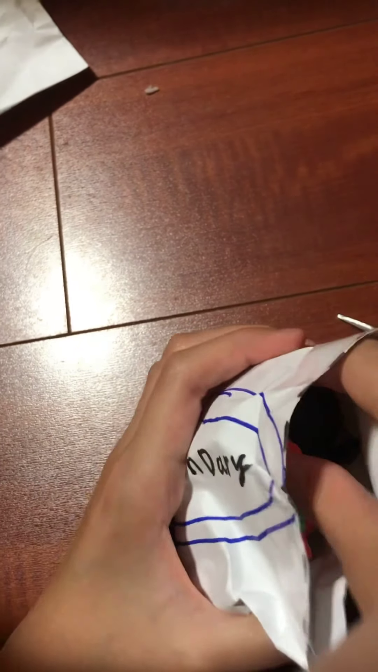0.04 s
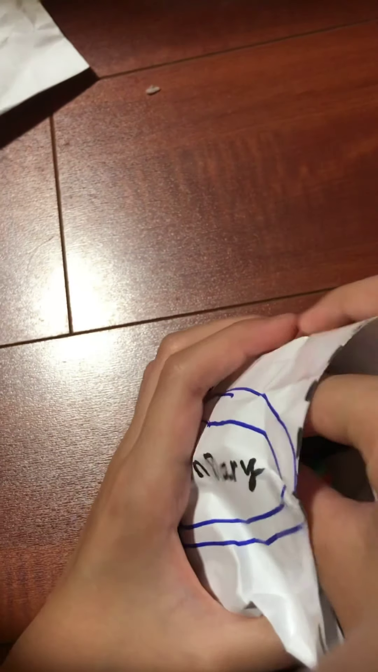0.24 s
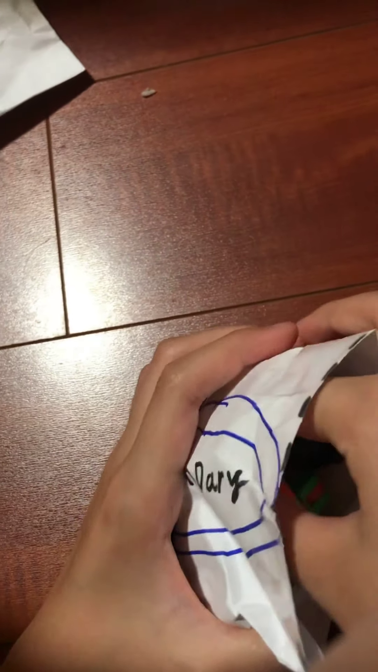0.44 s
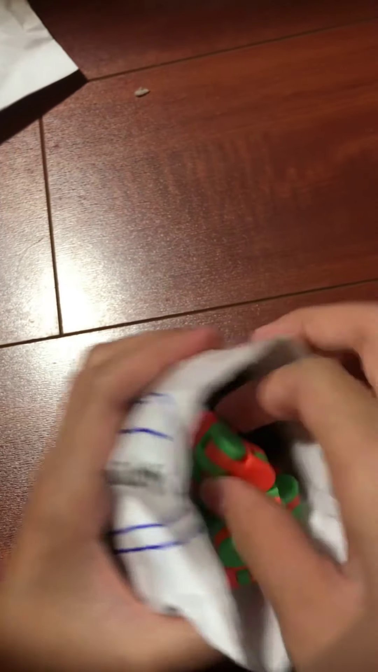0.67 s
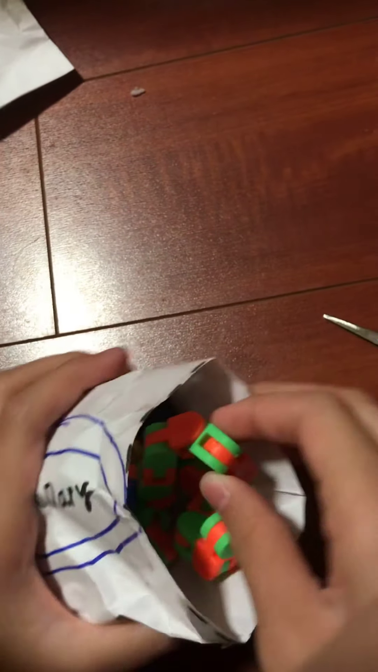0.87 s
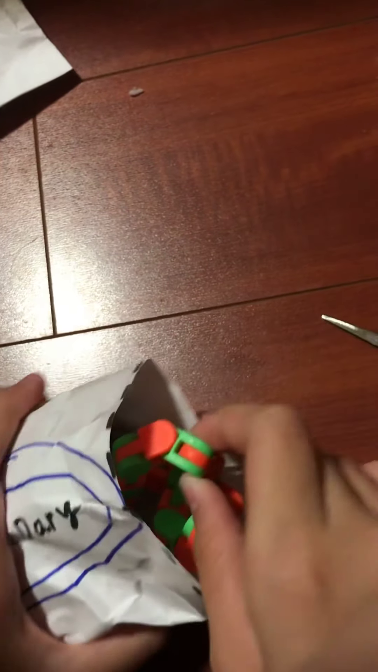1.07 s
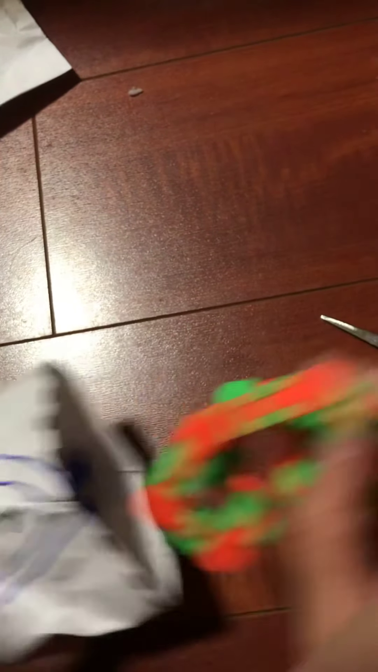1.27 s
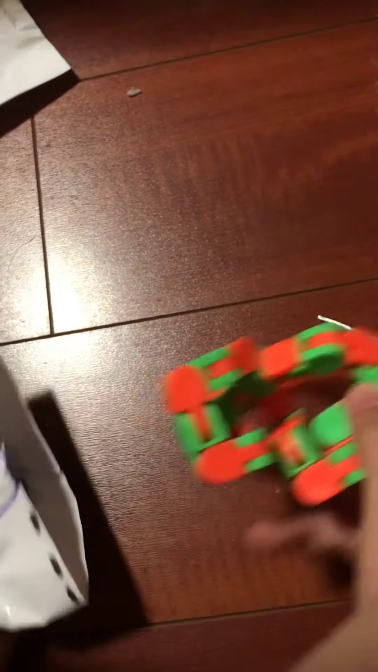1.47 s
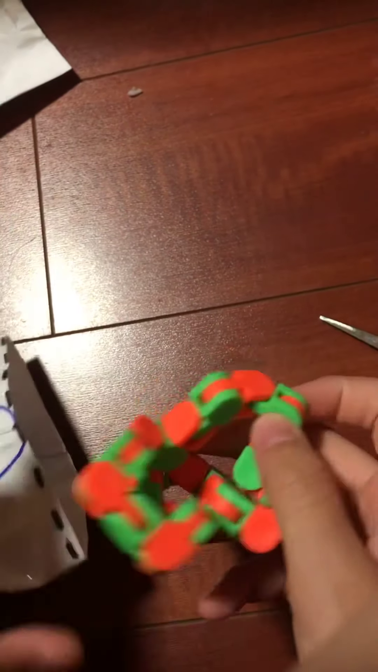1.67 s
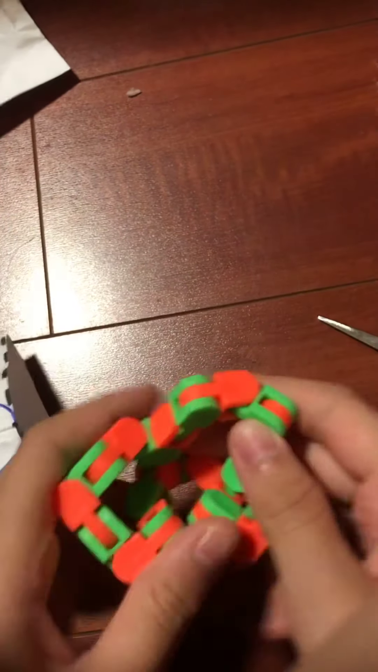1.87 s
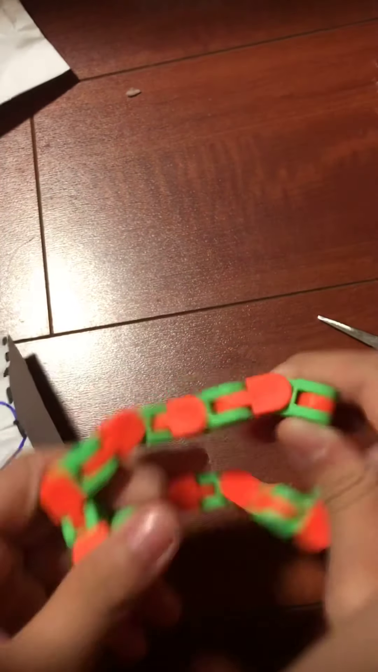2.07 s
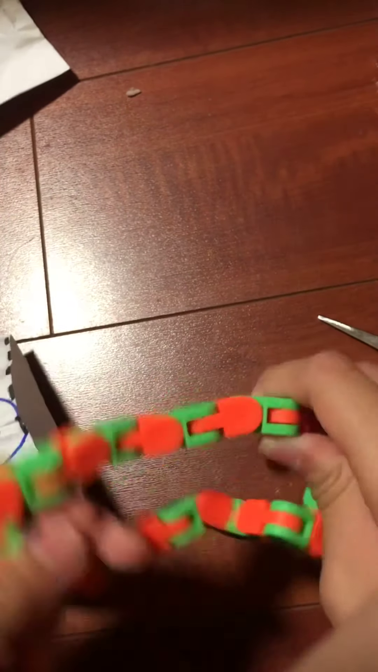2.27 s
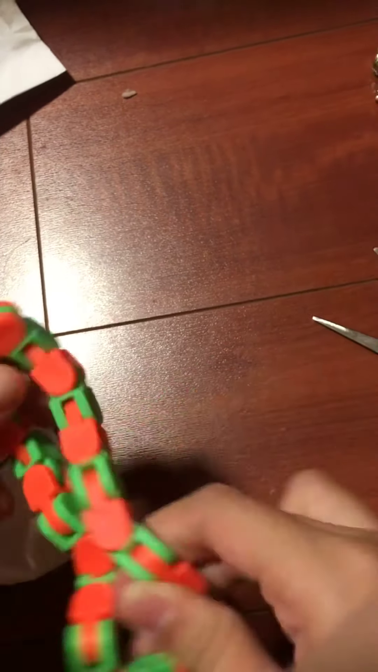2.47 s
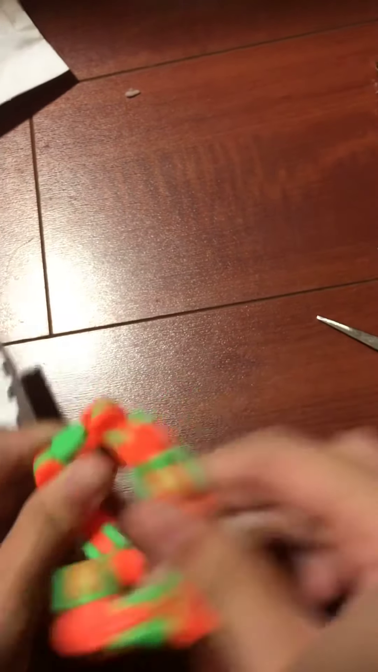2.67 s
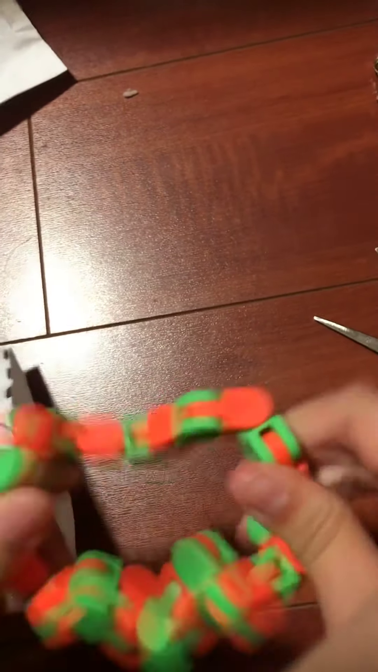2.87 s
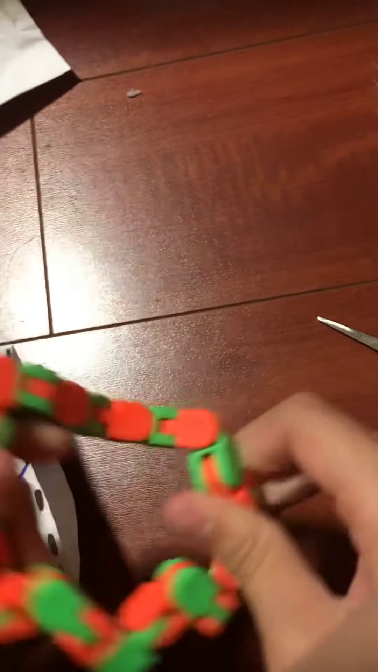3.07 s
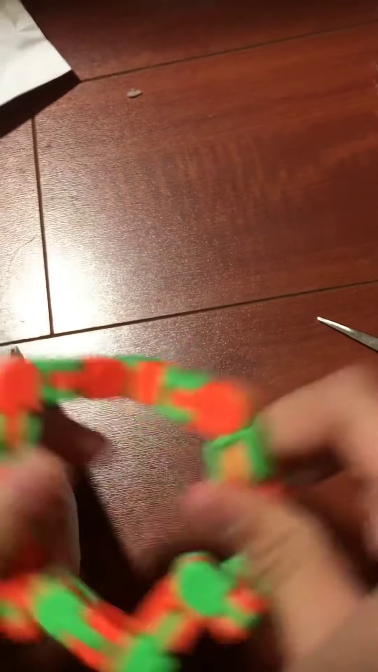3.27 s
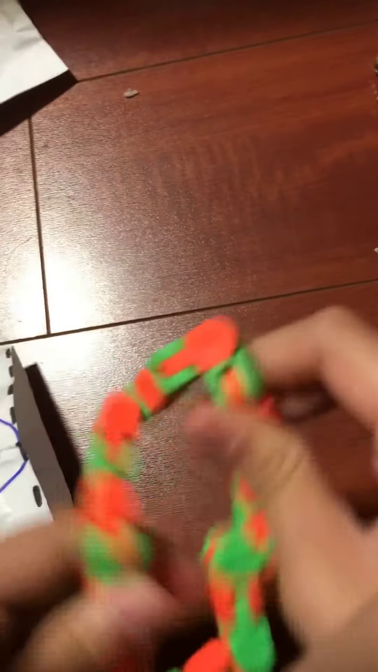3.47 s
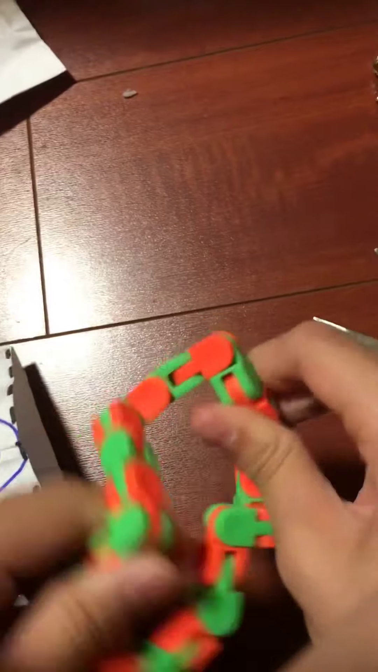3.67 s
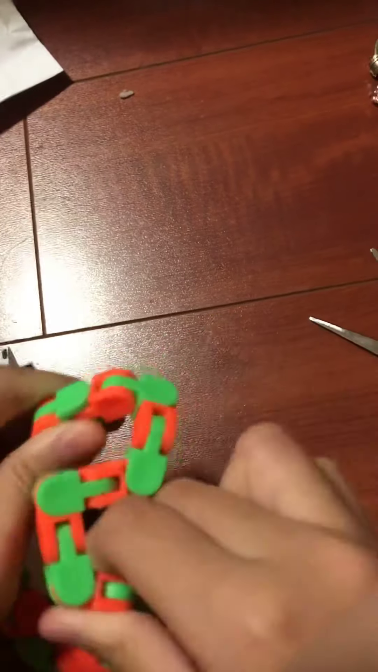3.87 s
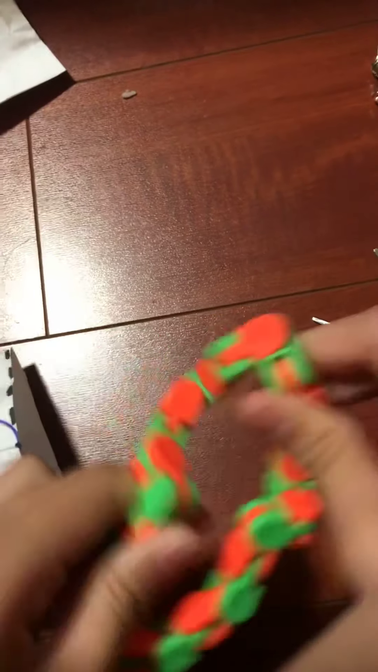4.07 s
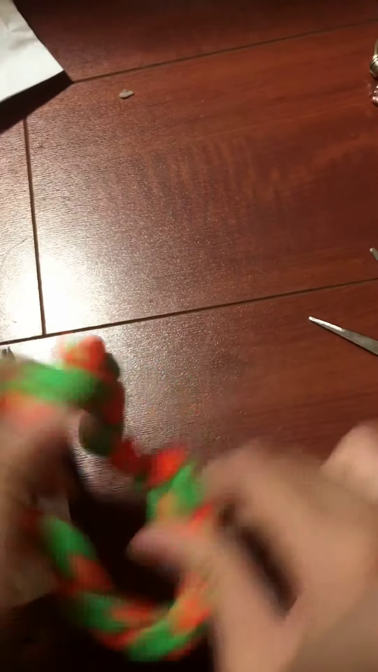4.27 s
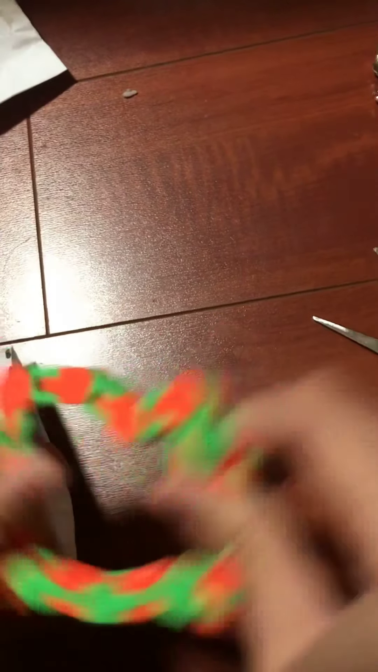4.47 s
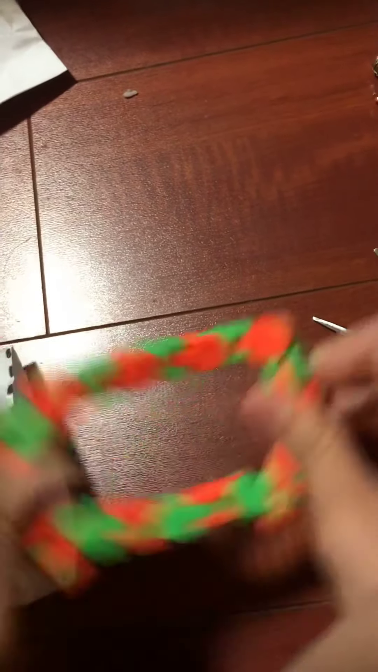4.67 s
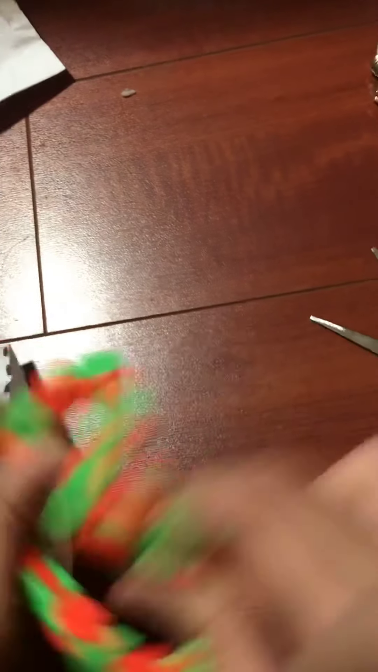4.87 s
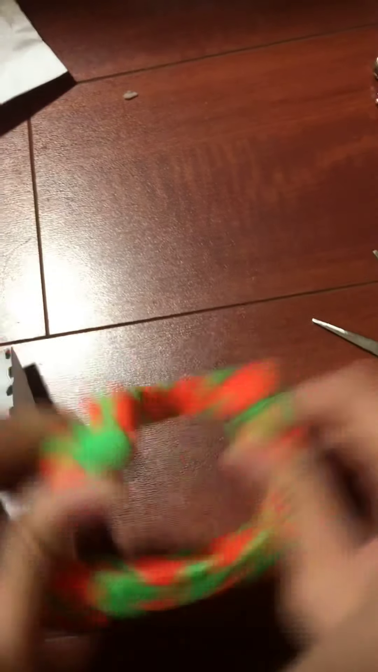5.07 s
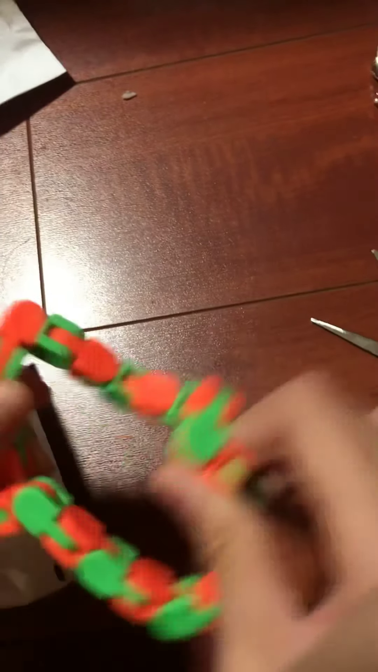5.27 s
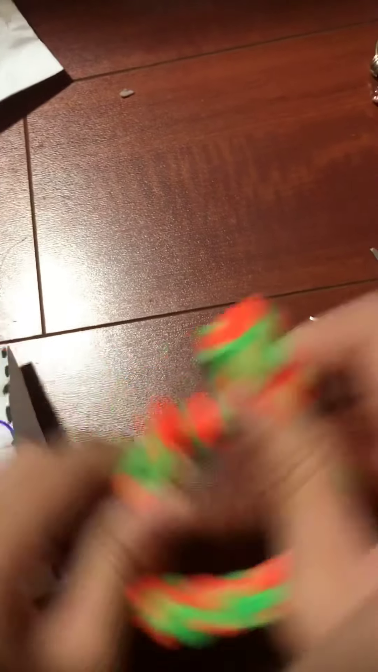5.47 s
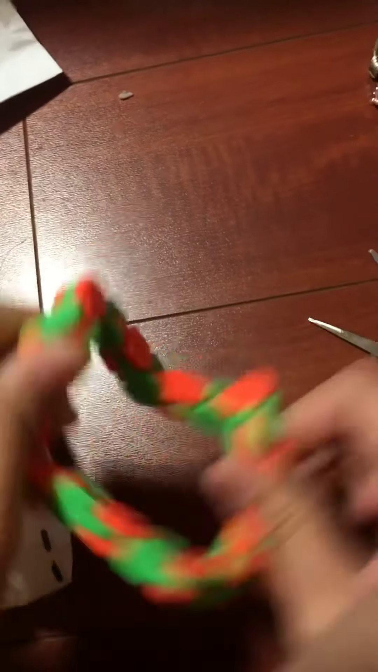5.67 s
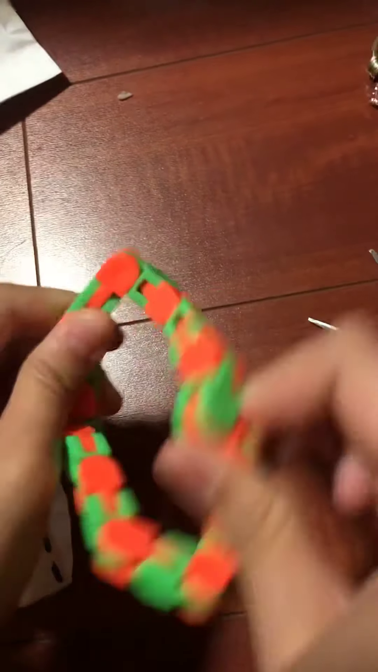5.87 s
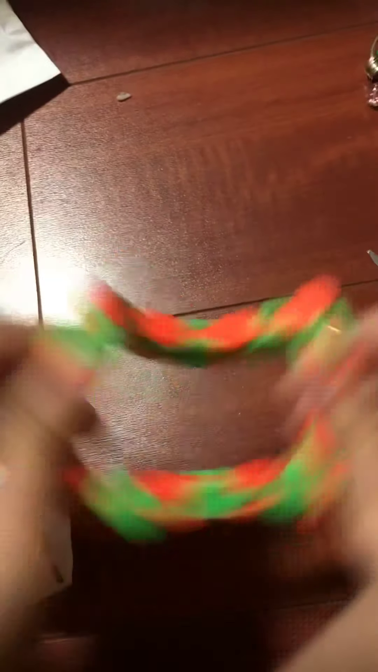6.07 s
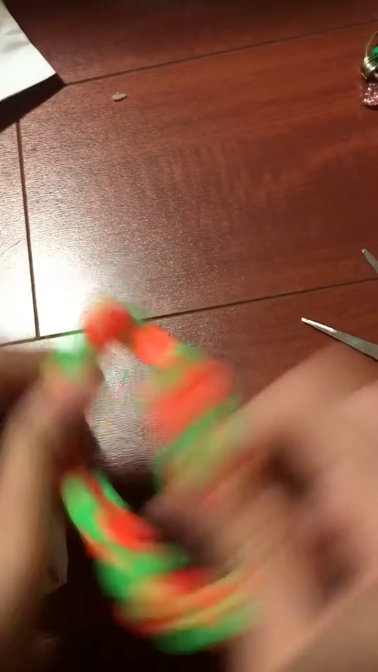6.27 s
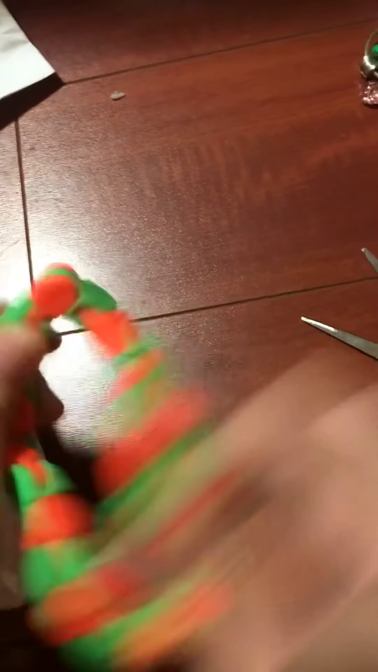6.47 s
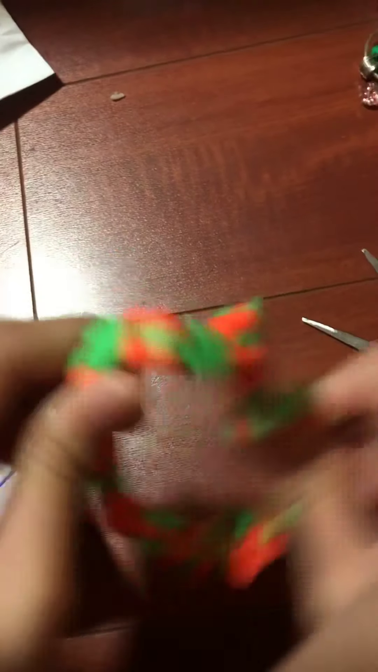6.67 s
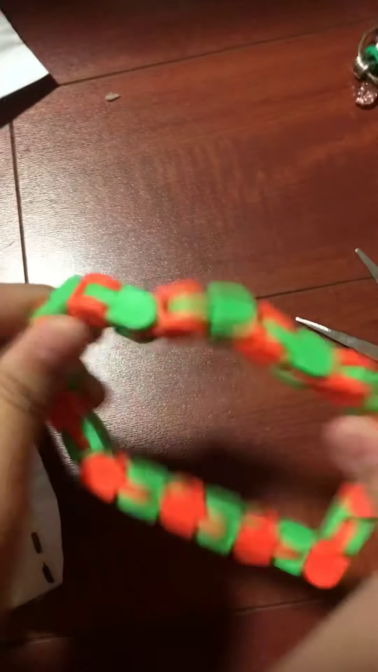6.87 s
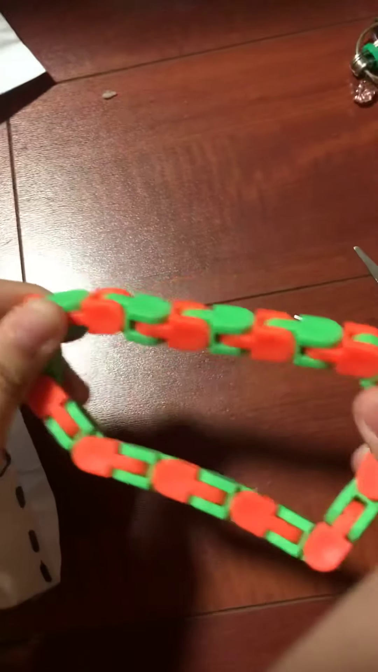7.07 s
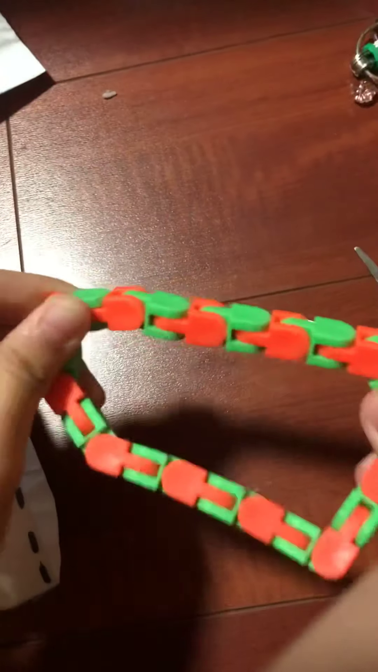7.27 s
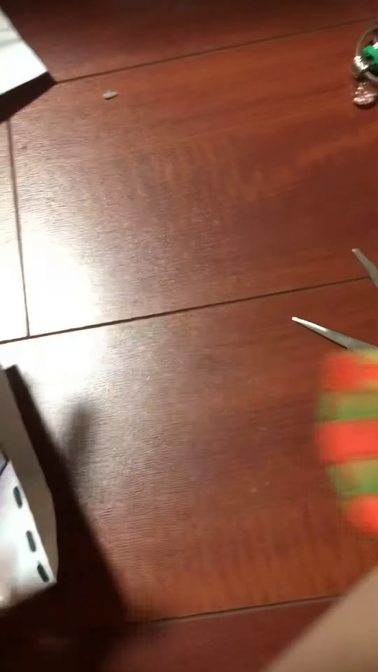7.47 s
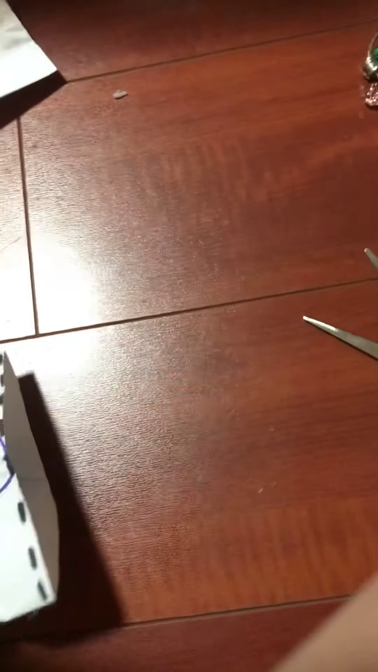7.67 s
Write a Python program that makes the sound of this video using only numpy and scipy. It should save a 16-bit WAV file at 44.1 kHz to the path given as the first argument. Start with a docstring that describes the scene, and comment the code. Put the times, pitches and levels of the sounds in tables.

```python
"""In a small quiet room with low rumble and a faint mains hum, hands pull a plastic snap-link chain from a paper bag.
The bag rustles, crackles and rings with random slips of its fibres; its pops are blows on resonances, smeared in pitch.
Skin and sleeve rub as grainy, coloured noise while the chain is turned over and bent, and loose joints tick.
Then the joints snap from notch to notch as short blows on ringing links, with a few soft bumps on the table.
At the end the chain drops on the wooden table as a burst of rattling blows."""
import sys
import numpy as np
from scipy import signal
from scipy.fft import rfft, irfft, next_fast_len
from scipy.io import wavfile
from scipy.ndimage import uniform_filter1d

SR = 44100
rng = np.random.default_rng(int(sys.argv[2]) if len(sys.argv) > 2 else 0)


def int16_out(signal):
    """Quantize to a 16-bit WAV file."""
    q = np.round(np.clip(np.atleast_2d(signal).T, -1, 1) * 32767)
    wavfile.write(sys.argv[1], SR, q.astype(np.int16))


N = 340893

# Quiet room rumble, relative spectrum: hz [Hz], density_db [dB per Hz]
ROOM_COLOUR = [(25, -11.5), (45, -10.5), (75, 0), (130, -8.5), (330, -18.5), (1000, -17.5), (2300, -26.5),
               (2750, -35), (16000, -40)]
ROOM_DB, HUM_DB, HUM_HZ = -53.5, -61, 59  # rms levels before the gain control
ROOM_T60_S = 0.26
CUTOFF_HZ = 16200

# Chain and fingers drag on the paper, swelling and dying away; levels before the rustle's trim:
# peak_s [s], level_db [dB], swell_s [s, time constant on either side]
PAPER_DRAGS = [(.04, -46.5, 0.043), (.19, -54, 0.024), (.38, -52, 0.036), (0.644, -29, 0.045),
               (0.927, -42.5, 0.024), (1.162, -24, 0.013), (1.187, -27, 0.024), (1.52, -50, 0.089),
               (2.615, -39.5, 0.01), (2.727, -45.5, 0.038)]
# The bag rustles faintly as long as a hand holds it, then settles
HOLD_DB, LET_GO_S, SETTLE_S = -52.5, 1.595, 0.046
# Paper fibres, relative spectrum: hz [Hz], density_db [dB per Hz]
RUSTLE_COLOUR = [(90, -18), (260, -7), (650, -6), (1100, -2), (1600, -5), (2800, -11), (6200, -10.5),
                 (7500, -14), (15500, -25.5)]
# Above an easy drag the bag's low notes gain less and the fibres' hiss more (dB per dB)
EASY_DRAG_DB, BODY_LAG, HISS_LEAD, BODY_EDGE_HZ = -33.5, 0.27, 0.15, 2000

# Resonances of the bag's walls and the air inside: hz [Hz], width_hz [Hz], level_db [dB]
BAG_MODES = [(309, 205, -12), (740, 250, -3), (1123, 273, 4.5), (1388, 275, 1.5), (1903, 184, -1.5),
             (3700, 710, -6.5), (5880, 1120, -10.5), (11000, 6700, -29.5)]
# The bag buckling or being knocked; levels before the pops' trim:
# start_s [s], level_db [dB], lows_db [dB over mids], highs_db [dB over mids]
BAG_POPS = [(0.089, -24, -13, -15.5), (0.1435, -41, -20, 4), (0.219, -23.5, -32.5, -5.5),
            (0.4038, -28, 4, -18), (0.4508, -23.5, -10, -6.5), (0.473, -31, -9, -8),
            (0.574, -31.5, -16, 13), (0.629, -26.5, -17, 8), (0.647, -21.5, -14, 7),
            (0.6522, -24.5, -23, 1), (0.6893, -20.5, -14, -2.5), (0.7338, -20, -3, -13.5),
            (1.1495, -24, -14, -8), (1.158, -13, -14, -8.5), (1.162, -20.5, -17, -3.5),
            (1.1722, -19.5, -19, 1), (1.1855, -25, -15, -2), (1.1905, -22, -17, -3),
            (1.2232, -19, -14, -11.5), (1.2595, -22, -8, -12), (1.2888, -28, -15, -3),
            (1.2968, -17, -10, -9.5), (2.6006, -30.5, -33, -31), (2.6364, -32.5, -15, -7),
            (2.7237, -30, -4.5, -30)]
# Bending waves: delay scale, roughly the time a 1 kHz wave takes to cross the bag
CROSSING_S = 0.0007
WALL_RING = (700, 103, -2.1)  # the wall after a pop: hz, width_hz, level_db

# Light rubbing of the grip between strokes, before the rub's trim: time_s [s], level_db [dB]
GRIP_CURVE = [(1.25, -45), (1.4, -44.5), (2.83, -48.5), (2.97, -60), (3.17, -46.5), (3.78, -48),
              (3.9, -60.5), (4.5, -54.5), (4.7, -70), (6.5, -60.5), (6.75, -73.5), (7.3, -66.5)]
# Strokes of skin and sleeve as the chain is turned, before the rub's trim; in the first, the links also slide
# on each other with a high scrape: # start_s [s], length_s [s], level_db [dB], scrape_hz [Hz, centre of the
# scrape]
RUB_STROKES = [(1.424, .19, -34.5, 13300), (1.64, 0.088, -39, 6300), (1.729, 0.076, -37, 4530),
               (1.939, 0.055, -37.5, 8700), (2.059, 0.055, -43, 4300), (2.118, .13, -39.5, 4400),
               (2.286, 0.11, -45.5, 4400), (2.495, 0.017, -39, 5800), (2.605, 0.12, -36.5, 6100),
               (2.77, 0.031, -37.5, 5900), (3.024, 0.016, -48, 6000), (3.14, 0.11, -41, 6060),
               (3.337, 0.096, -40, 4530), (3.508, 0.22, -43.5, 5060), (3.956, 0.06, -41.5, 2700),
               (4.052, 0.25, -43, 5270), (4.337, 0.06, -44.5, 4340), (4.434, 0.063, -49, 3000),
               (7.412, 0.028, -53, 3760)]
# Every stroke builds over a share of its length, sags, and dies away
STROKE_ATTACK_SHARE, STROKE_SAG_DB_PER_S, STROKE_RELEASE_S = 0.34, 26.5, 0.033
# Skin and sleeve friction, relative spectrum: hz [Hz], density_db [dB per Hz]
RUB_COLOUR = [(200, -21.5), (1100, -9.5), (2440, -1.5), (3030, -8), (4440, 0), (4950, -6.5), (6000, -1.5),
              (7600, -12.5), (8640, -7), (10300, -16.5), (13100, -12.5), (16000, -24.5)]

# Resonances of a hollow plastic link held in the fingers: hz [Hz], width_hz [Hz], level_db [dB]
LINK_MODES = [(227, 51, -9), (1020, 480, -7.5), (2460, 1030, -5.5), (4130, 850, -1.5), (6000, 1120, 7),
              (7180, 1140, 8.5), (8680, 940, 5), (13300, 2830, -0.5), (15140, 1130, 0)]
# Joints snapping: start_s [s], level_db [dB], highs_db [dB over mids], ring_hz [Hz, ring of that joint]
JOINT_SNAPS = [(2.163, -12.5, 3.5, 7800), (2.532, -27, -1, 4340), (2.642, -31.5, -2, 8600),
               (2.8592, -12.5, 4.5, 9900), (2.8763, -16, -0.5, 6760), (3.114, -32.5, 7, 7800),
               (3.2115, -10, 8.5, 10200), (3.3007, -27, 1, 4600), (3.4321, -14, 2, 7500),
               (3.6775, -30.5, -3, 6740), (3.7718, -12, 2.5, 7200), (3.781, -29, -6, 7000),
               (3.7947, -24.5, -2.5, 7640), (3.9102, -35.5, -3, 4400), (3.9449, -27.5, -6, 6500),
               (4.0058, -34, -11, 4120), (4.1642, -18.5, -8, 6950), (4.2313, -24.5, -7, 3500),
               (4.261, -35, -3, 5730), (4.35, -16.5, 3, 10000), (4.486, -35.5, -12, 1380),
               (4.5071, -14, 2, 6900), (4.622, -25, 1, 4260), (4.691, -39.5, 0.5, 6200),
               (4.7594, -31.5, -5, 4700), (4.829, -36.5, -4, 7000), (4.8369, -18, 4, 10000),
               (4.9633, -18, 6.5, 9400), (4.974, -32, -5, 5230), (5.043, -14, -1, 7700),
               (5.2842, -39, -10, 5260), (5.3214, -41.5, -6, 6600), (5.35, -37.5, 0, 8160),
               (5.399, -28, -9, 6500), (5.4704, -16.5, -0.5, 5160), (5.5831, -22.5, 3, 8750),
               (5.6375, -15.5, -2, 7400), (5.767, -21.5, -7, 7300), (5.7722, -12, 6, 7650),
               (5.9265, -30, -4.5, 7340), (6.022, -24.5, -2, 6460), (6.034, -19.5, 2.5, 8100),
               (6.076, -36, -1, 6100), (6.1005, -31, -6, 6360), (6.1464, -35, -10, 6700),
               (6.2053, -32, -3.5, 4370), (6.2235, -31, -5, 7100), (6.4047, -18, 1, 6640),
               (6.4252, -26.5, -6.5, 6750), (6.441, -18.5, -5, 7000), (6.5227, -36.5, -6, 5100),
               (6.5561, -26, -2, 1130), (6.6075, -29.5, -0.5, 6430), (6.64, -42.5, -8, 3900),
               (6.8411, -24, -3.5, 3650), (6.8539, -32, -3, 6840), (6.867, -30, 0.5, 9100)]
# A harder snap has less body: lows over mids at the usual level, loss in dB per dB
USUAL_SNAP_DB, SNAP_LOWS_DB, THINNING = -26, -10.5, 0.42
# A joint that rings low has more body: gain of the lows per octave below the usual ring
USUAL_RING_HZ, BODY_DB_PER_OCTAVE = 6900, 3

# A hand bumps the table, before the bumps' trim: start_s [s], level_db [dB]
TABLE_BUMPS = [(2.32, -41), (3.676, -42), (3.71, -43.5)]
# Resonances of table top and chain together: hz [Hz], width_hz [Hz], level_db [dB]
TABLE_MODES = [(222, 88, -4.5), (493, 250, -10), (775, 220, -2), (1194, 150, -2), (1750, 580, -1),
               (2540, 490, 5.5), (3720, 560, 5), (5600, 1300, -1), (13700, 2100, -1.5)]
# The chain landing: start_s [s], level_db [dB], lows_db [dB over mids], highs_db [dB over mids]
CHAIN_LANDINGS = [(7.6064, -34, -4, 12), (7.6101, -20, -6, 2), (7.6403, -29, 2.5, -11),
                  (7.684, -40, 9, -11), (7.704, -25, 2.5, -5.5)]

# Automatic gain: the cut is in dB per dB over the threshold; the attack smooths every gain change
GAIN_THRESHOLD_DB, GAIN_SLOPE, GAIN_RECOVERY_DB_PER_S, GAIN_ATTACK_S = -17.5, 0.17, 10, 0.0114


def from_db(db):
    """Decibels to gain."""
    return np.exp(np.asarray(db) * (np.log(10) / 20))


def rms_one(x):
    """Scale to rms 1."""
    return x / np.sqrt(np.mean(x ** 2) + 1e-20)


def in_time(rows):
    """A curve at every sample."""
    return np.interp(np.arange(N) / SR, *np.transpose(rows))


def seconds(length):
    """Time axis of a short sound."""
    return np.arange(int(length * SR)) / SR


def coloured(x, spectrum):
    """Give a steady sound a spectrum, rolled off below its first point; rms 1."""
    hz, db = np.transpose(spectrum)
    size = next_fast_len(N, real=True)
    bins = np.maximum(np.fft.rfftfreq(size, 1 / SR), 1)
    colour = from_db(np.interp(np.log(bins), np.log(hz), db))
    low_cut = bins / np.hypot(bins, hz[0])
    return rms_one(irfft(rfft(x, size) * colour * low_cut, size)[:N])


def drift(rate):
    """Slow chance with `rate` random knots a second; rms 1."""
    knots = rng.standard_normal(int(N / SR * rate) + 2)
    return rms_one(np.interp(np.arange(N) / SR * rate, np.arange(len(knots)), knots))


def wandering(x, depth_db, rate):
    """As the contact moves, each half octave above 1 kHz swells and fades on its own."""
    size = next_fast_len(N, real=True)
    spectrum, out = rfft(x, size), 0
    place = np.clip(2 * np.log2(np.fft.rfftfreq(size, 1 / SR) / 1000 + 1e-9), 0, 8)
    for k in range(9):
        overlap = np.maximum(1 - abs(place - k), 0)
        band = irfft(spectrum * overlap, size)[:N]
        out = out + band * from_db(depth_db * drift(rate))
    return rms_one(out)


def grains(per_s, spread_db):
    """Random tiny slips of uneven size; rms 1."""
    sizes = from_db(spread_db * np.minimum(rng.exponential(1, N), 5)) * rng.choice([-1, 1], N)
    return rms_one(sizes * (rng.random(N) < per_s / SR))


def resonate(x, modes):
    """Parallel resonances of alternating sign."""
    out = 0
    for k, (hz, width, db) in enumerate(modes):
        r = np.exp(-np.pi * width / SR)
        poles = [1, -2 * r * np.cos(2 * np.pi * hz / SR), r * r]
        ring = signal.lfilter([1, 0, -1], poles, x + 1e-18) * (1 - r * r) / 2
        out = out + (-1) ** k * from_db(db) * ring
    return out


def detuned(modes, spread):
    """The modes shift a little with every new grip."""
    hz, width, db = np.transpose(modes)
    return np.c_[hz * np.exp(spread * rng.standard_normal(len(hz))), width, db]


def contact(chatter, chatter_s, rattle, rattle_s):
    """One sharp push, then a quick chatter of the surfaces and a longer rattle."""
    t = seconds(.08)
    envelope = 0
    for share, decay_s in [(chatter, chatter_s), (rattle, rattle_s)]:
        envelope = envelope + share * np.exp(-t / decay_s) / np.sqrt(decay_s * SR / 2)
    force = rng.standard_normal(len(t)) * envelope
    force[0] += 1
    return force


def struck(force, modes, split_hz, lows_db, highs_db):
    """A body rings; where and how hard it is hit decides the share of its low and high register."""
    sound, out = resonate(force, modes), 0
    registers = [(split_hz[0], "low", lows_db), (split_hz, "band", 0), (split_hz[1], "high", highs_db)]
    for edges, kind, db in registers:
        register = signal.sosfilt(signal.butter(3, edges, kind, fs=SR, output="sos"), sound)
        out = out + from_db(db) * rms_one(register)
    return out


def add(out, s, sound, db, span_s):
    """Place a sound at s, with the given rms level over its first span_s."""
    at = int(s * SR)
    level = np.sqrt(np.mean(sound[:int(span_s * SR)] ** 2))
    out[at:at + len(sound)] += (from_db(db) * sound / level)[:N - at]


def echo(x, delay_s, gain):
    """A sound with one reflection; the delay may move."""
    n = np.arange(len(x))
    return x + gain * np.interp(n - delay_s * SR, n, x, left=0)


def background():
    """Low room rumble as coloured noise, and mains hum as one sine."""
    hum = np.sqrt(2) * np.sin(2 * np.pi * HUM_HZ * np.arange(N) / SR)  # rms 1
    rumble = coloured(rng.standard_normal(N), ROOM_COLOUR)
    return from_db(ROOM_DB) * rumble + from_db(HUM_DB) * hum


def room(x):
    """A short diffuse tail that builds up after the direct sound."""
    t = seconds(.6)
    build_up = np.clip((t - .003) / 0.0015, 0, 1)
    tail = rng.standard_normal(len(t)) * from_db(-60 * t / ROOM_T60_S) * build_up
    return signal.fftconvolve(x, tail / np.linalg.norm(tail))[:N]


def drag_db():
    """How hard the paper is dragged: the holding hand plus every swell, added as powers."""
    t = np.arange(N) / SR
    hold = from_db(HOLD_DB) * np.exp(-np.maximum(t - LET_GO_S, 0) / SETTLE_S)
    power = hold ** 2
    for s, db, swell_s in PAPER_DRAGS:
        power = power + (from_db(db) * np.exp(-abs(t - s) / swell_s)) ** 2
    return 10 * np.log10(power + 1e-14)


def rustle(gain_db=-1):
    """Paper fibres catch and let go, more often and more brightly the harder the chain drags."""
    level_db = drag_db()
    slips_per_s = 3500 * from_db(0.22 * (level_db + 40))
    slips = grains(slips_per_s, spread_db=3.5) + 0.99 * rng.standard_normal(N)
    paper = wandering(coloured(slips, RUSTLE_COLOUR), depth_db=4.0, rate=20.9)
    body = signal.sosfiltfilt(signal.butter(2, BODY_EDGE_HZ, fs=SR, output="sos"), paper)
    hiss = paper - body
    force_db = np.maximum(level_db - EASY_DRAG_DB, 0)
    paper = body * from_db(-BODY_LAG * force_db) + hiss * from_db(HISS_LEAD * force_db)
    return paper * from_db(level_db + gain_db + 2.4 * drift(rate=54))


def hollow(hz=1190, width_hz=170, level_db=-48, follow=0.28):
    """The air in the open bag rings with every slip of the paper, until the bag is let go."""
    air = rms_one(resonate(grains(per_s=570, spread_db=2.5), [(hz, width_hz, 0)]))
    force_db = drag_db() - HOLD_DB
    # follows a harder drag only in part, but the settling bag in full
    return air * from_db(level_db + np.minimum(follow * force_db, force_db))


def crackle(per_s=70, over_drag_db=22, spread_db=3, growth=.7, highest_ratio=3.0):
    """Creases flip at random, more often and strongly the harder the drag; smaller ones ring higher."""
    level_db, out = drag_db(), 0
    chance_db = spread_db * np.clip(rng.standard_normal(N), -2, 2)
    sizes = from_db(level_db + over_drag_db + chance_db)
    ratios = np.geomspace(1, highest_ratio, 6)
    flips_per_s = per_s * from_db(growth * (level_db - EASY_DRAG_DB))  # all crease sizes together
    for ratio in ratios:
        flips = rng.random(N) < flips_per_s / (SR * len(ratios))
        crease = [(min(hz * ratio, CUTOFF_HZ), width * 2 * ratio, db) for hz, width, db in BAG_MODES]
        out = out + resonate(sizes * flips, crease)
    return out


def rub_db():
    """How hard the hands rub: the grip plus every stroke's attack, sag and release."""
    t = np.arange(N) / SR
    power = from_db(in_time(GRIP_CURVE)) ** 2
    for s, length, db, _ in RUB_STROKES:
        near = slice(*np.searchsorted(t, [s, s + length + .5]))
        age = t[near] - s
        attack = np.minimum(age / (STROKE_ATTACK_SHARE * length), 1)
        release = np.exp(-np.maximum(age - length, 0) / STROKE_RELEASE_S)
        power[near] += (from_db(db - STROKE_SAG_DB_PER_S * age) * attack * release) ** 2
    return 10 * np.log10(power)


def scrape(slips, relative_width=0.168):
    """The gap between fingers and links colours each stroke with a broad resonance of its own."""
    out = np.zeros(N)
    for s, length, _, hz in RUB_STROKES:
        near = slice(*np.searchsorted(np.arange(N) / SR, [s, s + length + 2 * STROKE_RELEASE_S]))
        ring = rms_one(resonate(slips[near], [(hz, relative_width * hz, 0)]))
        out[near] += ring * signal.windows.tukey(len(ring))
    return out


def rub(gain_db=-0.47, scrape_db=-10):
    """Grainy friction hiss and scrape, combed by its reflection off the table as the hands move."""
    slips = grains(per_s=4500, spread_db=3.0) + 0.5 * rng.standard_normal(N)
    combed = echo(slips, 0.00165 + 0.0002 * drift(rate=4), gain=0.53)
    hiss = wandering(coloured(combed, RUB_COLOUR), depth_db=1.0, rate=14)
    friction = hiss + from_db(scrape_db) * scrape(combed)
    return friction * from_db(rub_db() + gain_db + 1.96 * drift(rate=70))


def loose_ticks(per_s=28, level_db=-27, spread_db=4, settle_s=0.075):
    """Loose joints tick faintly while the fingers work the chain and as it settles after each snap."""
    t, snap_s = np.arange(N) / SR, np.sort([row[0] for row in JOINT_SNAPS])
    latest = np.maximum(np.searchsorted(snap_s, t) - 1, 0)
    since_snap = abs(t - snap_s[latest])  # ahead of the first snap: time until it
    working = np.clip((rub_db() + 56) / 10, 0, 1)
    busy = np.maximum(working, np.exp(-since_snap / settle_s))
    sizes = from_db(spread_db * np.clip(rng.standard_normal(N), -2, 2))
    ticks = (rng.random(N) < per_s * busy / SR) * sizes
    return from_db(level_db) * resonate(ticks * busy, LINK_MODES)


def dispersed(x):
    """Bending waves run faster the higher they are, so a pop sweeps from tick down to thump."""
    size = 2 * len(x)
    hz = np.fft.rfftfreq(size, 1 / SR)
    delay_s = CROSSING_S * (np.sqrt(1000 / (hz + 100)) - np.sqrt(2000 / SR))
    phase = 2 * np.pi * np.cumsum(delay_s) * SR / size  # delay summed over frequency
    return irfft(rfft(x, size) * np.exp(-1j * phase), size)[:len(x)]


def pops(gain_db=-1.5):
    """A crease flips over and shakes the whole bag."""
    out = np.zeros(N)
    for s, db, lows_db, highs_db in BAG_POPS:
        force = contact(chatter=0.54, chatter_s=0.0012, rattle=0.46, rattle_s=0.0042)
        bag = np.vstack([detuned(BAG_MODES, spread=0.046), WALL_RING])
        pop = dispersed(struck(force, bag, (600, 2500), lows_db, highs_db))
        add(out, s, pop, db + gain_db, span_s=0.0076)
    return out


def snap_lows_db(db, ring_hz):
    """Soft snaps and low-ringing joints have more body."""
    thinning_db = THINNING * (db - USUAL_SNAP_DB)
    return SNAP_LOWS_DB - thinning_db + BODY_DB_PER_OCTAVE * np.log2(USUAL_RING_HZ / ring_hz)


def snaps(gain_db=0, ring_db=-5.5, ring_width_hz=800, early_db=-32, wet_db=-22):
    """A joint jumps into the next notch and the link rings; the table reflects it."""
    direct, spread = np.zeros((2, N))
    for s, db, highs_db, ring_hz in JOINT_SNAPS:
        lows_db = snap_lows_db(db, ring_hz)
        force = contact(chatter=1.0, chatter_s=0.00076, rattle=0.38, rattle_s=0.0026)
        link = np.vstack([detuned(LINK_MODES, spread=0.037), (ring_hz, ring_width_hz, ring_db)])
        click = struck(force, link, (4500, 10500), lows_db, highs_db)
        reflected = echo(click, rng.uniform(0.0015, 0.0033), gain=0.24)
        add(direct, s, reflected, db + gain_db, span_s=0.0053)
        # a much fainter copy of the click starts a few ms early and softens the onset
        early_s = s - rng.uniform(0.0022, .009)
        add(direct, early_s, click, db + early_db + 3 * rng.standard_normal(), span_s=0.0065)
        # summed over all directions, the sound sent into the room has a smooth spectrum
        smooth = struck(signal.unit_impulse(len(force)), LINK_MODES, (4500, 10500), lows_db, highs_db)
        add(spread, s, smooth, db + wet_db, span_s=0.0081)
    return direct + room(spread)


def bumps(low_hz=105, high_hz=175, decay_s=0.012):
    """Soft blows wake only the lowest modes of the table, as two decaying sines."""
    out, t = np.zeros(N), seconds(.12)
    modes = np.sin(2 * np.pi * low_hz * t) + 0.59 * np.sin(2 * np.pi * high_hz * t)
    thud = modes * np.exp(-t / decay_s)
    for s, db in TABLE_BUMPS:
        add(out, s, thud, db + 0.5, span_s=0.019)
    return out


def landings(gain_db=0):
    """Many links hit the wood almost at once and rattle."""
    out = np.zeros(N)
    for s, db, lows_db, highs_db in CHAIN_LANDINGS:
        force = contact(chatter=1.4, chatter_s=0.0016, rattle=1.6, rattle_s=0.02)
        blow = struck(force, TABLE_MODES, (1500, 7000), lows_db, highs_db)
        add(out, s, blow, db + gain_db, span_s=0.0078)
    return out


def gain_control(x):
    """The gain ducks just after a loud sound and creeps back."""
    power = uniform_filter1d(x[0] ** 2, size=220)  # about 5 ms
    level_db = 10 * np.log10(np.maximum(power, 1e-12))
    wanted_cut_db = GAIN_SLOPE * np.maximum(level_db - GAIN_THRESHOLD_DB, 0)
    # a running maximum against a rising ramp lets each cut recover at a steady rate
    ramp = GAIN_RECOVERY_DB_PER_S * np.arange(N) / SR
    cut_db = np.maximum.accumulate(wanted_cut_db + ramp) - ramp
    keep = np.exp(-1 / (GAIN_ATTACK_S * SR))
    return x * from_db(-signal.lfilter([1 - keep], [1, -keep], cut_db))


def scene(friction_wet_db=-7, blow_wet_db=-14):
    """The joints snap close to the microphone; sleeves, bag and table get more room and sit farther off."""
    friction = rustle() + hollow() + rub()
    blows = crackle() + pops() + bumps() + landings()
    reflected = room(from_db(friction_wet_db) * friction + from_db(blow_wet_db) * blows)
    return (background() + friction + loose_ticks() + blows + snaps() + reflected)[None]


def record(dry):
    """The gain ducks a little, peaks past full scale are clipped, and the top is cut."""
    clipped = np.clip(gain_control(dry), -1, 1)
    top_cut = signal.ellip(10, .2, 70, CUTOFF_HZ, fs=SR, output="sos")
    return signal.sosfilt(top_cut, clipped)


dry = scene()
out = record(dry)
int16_out(out)
```